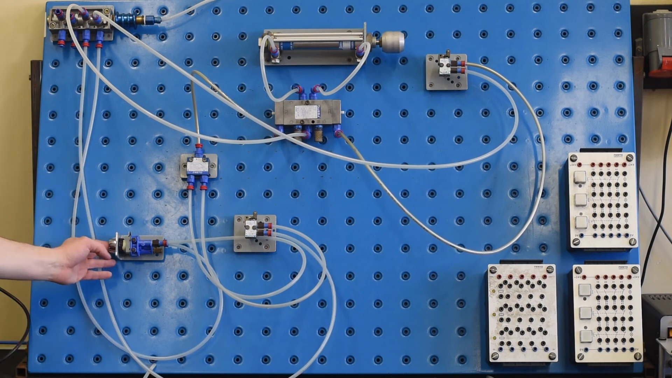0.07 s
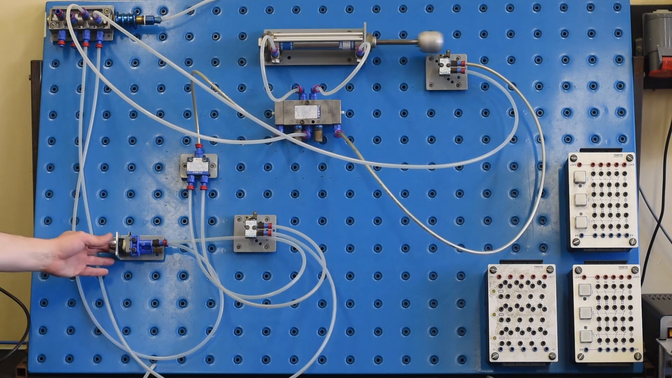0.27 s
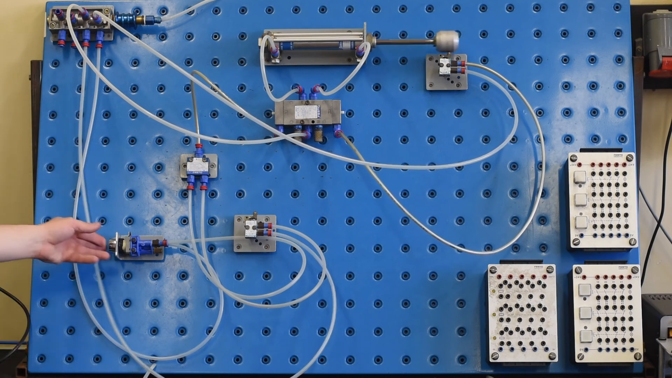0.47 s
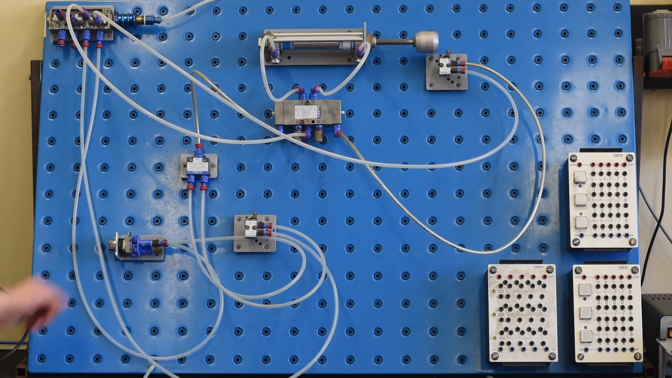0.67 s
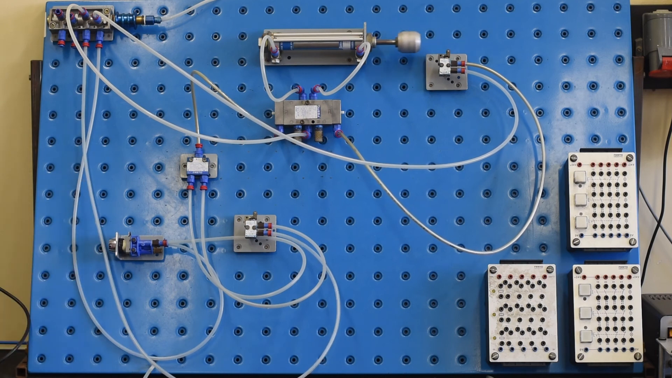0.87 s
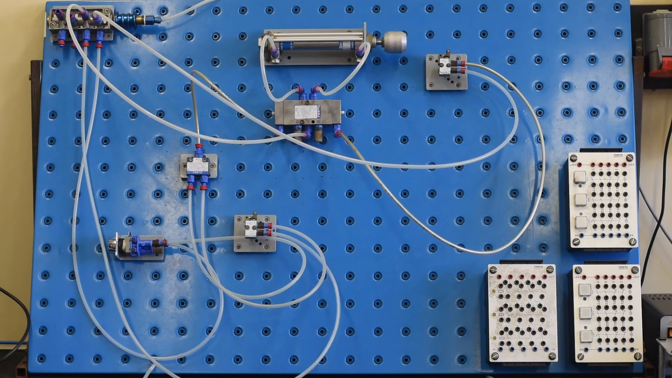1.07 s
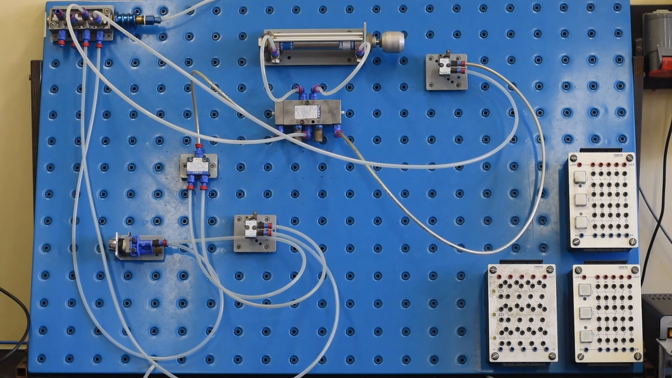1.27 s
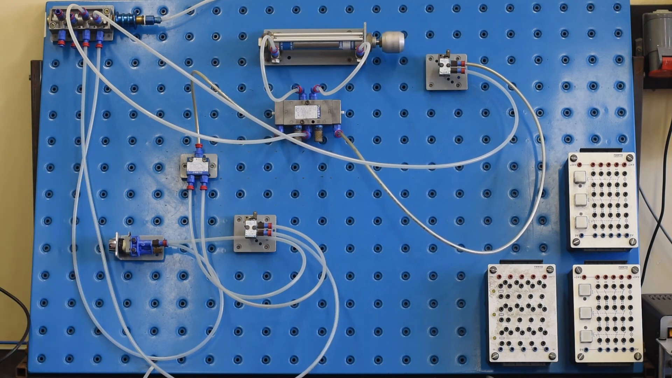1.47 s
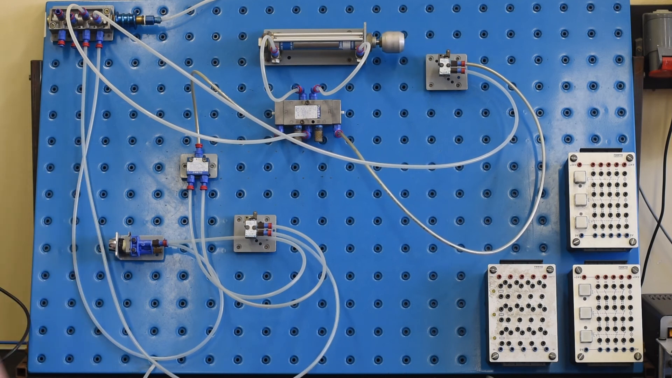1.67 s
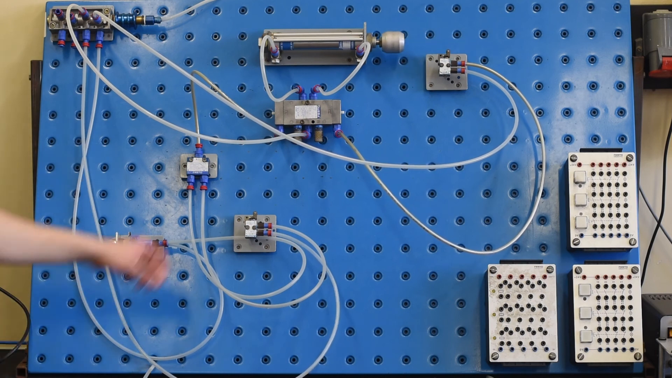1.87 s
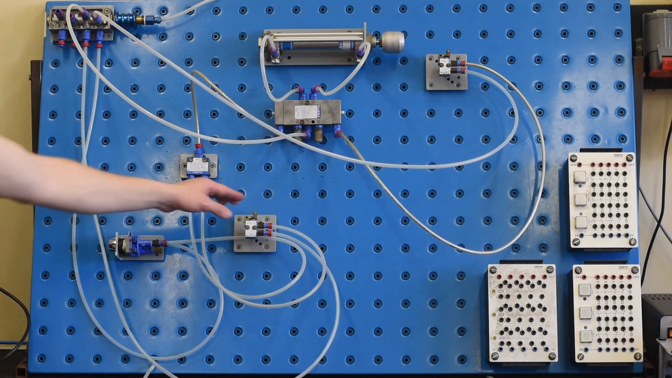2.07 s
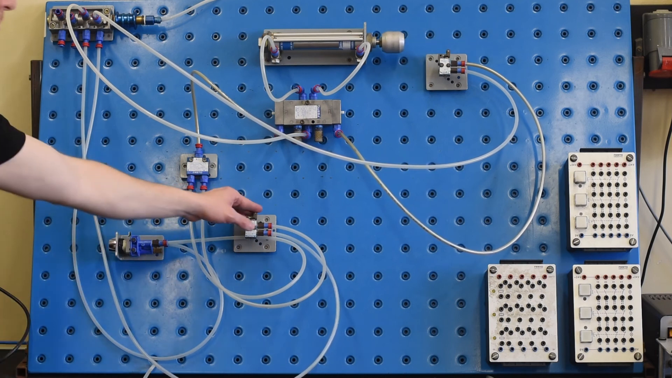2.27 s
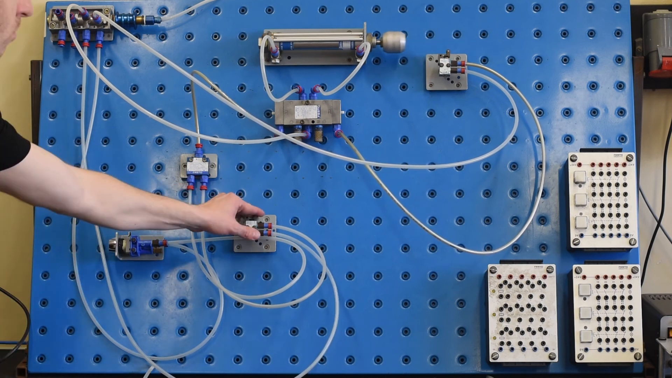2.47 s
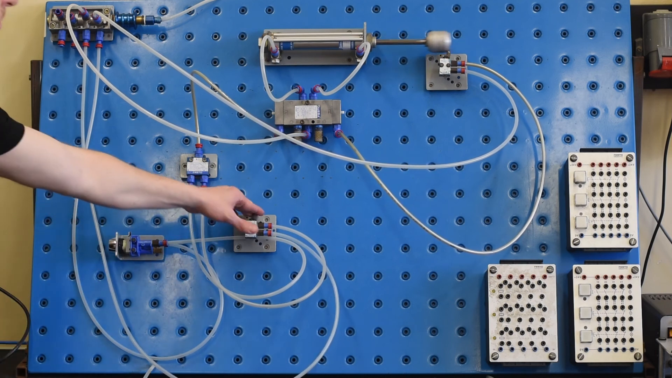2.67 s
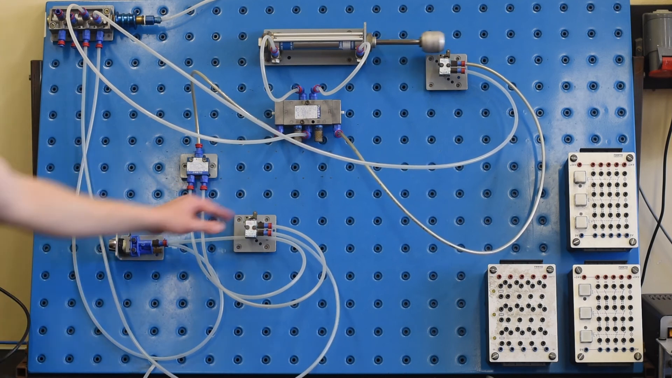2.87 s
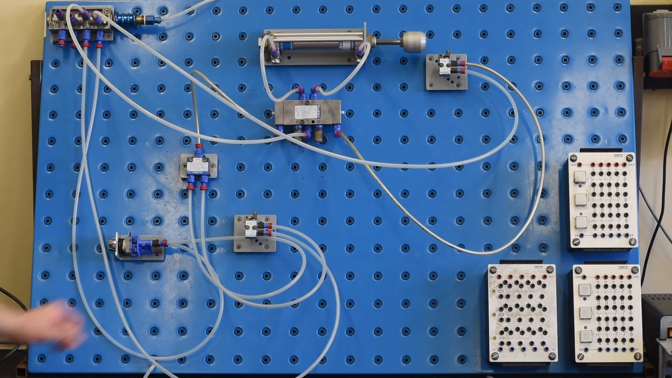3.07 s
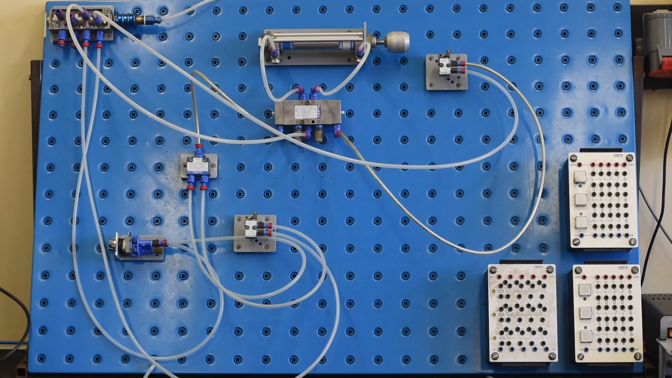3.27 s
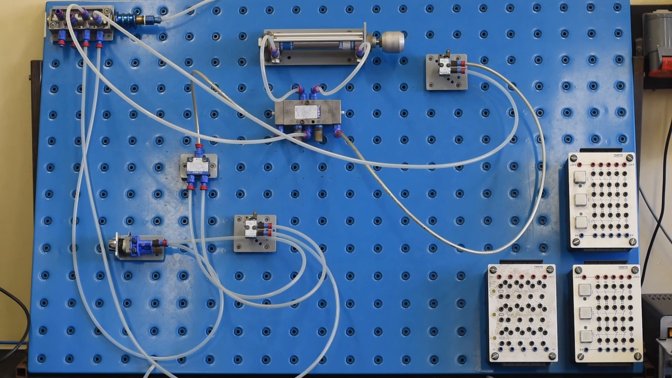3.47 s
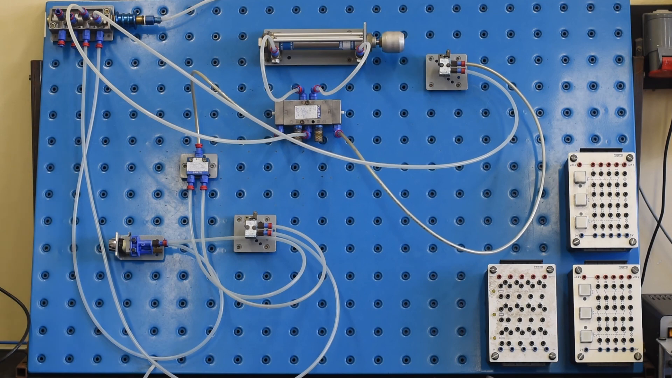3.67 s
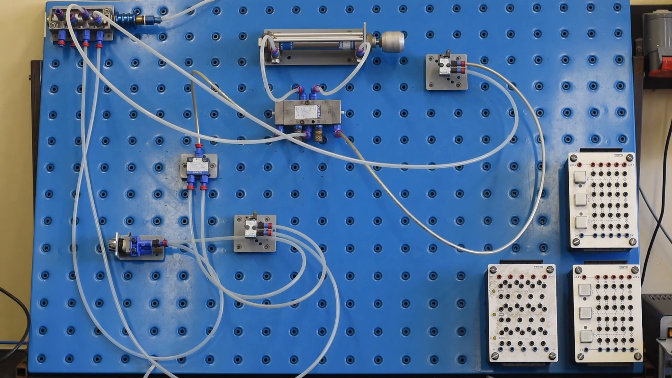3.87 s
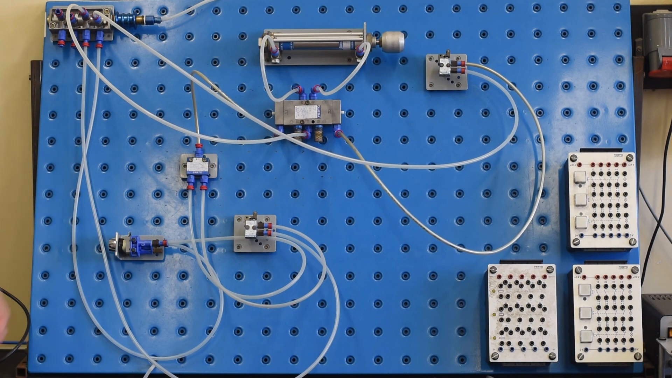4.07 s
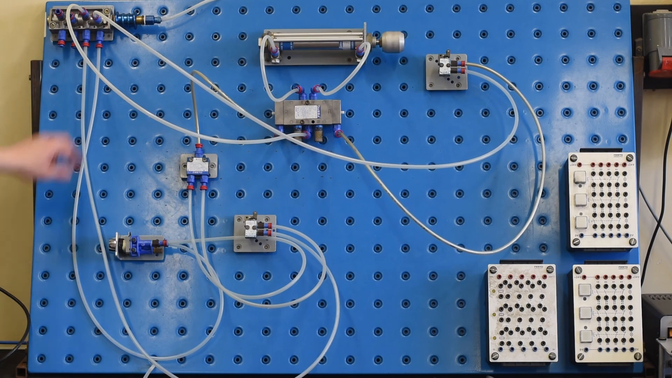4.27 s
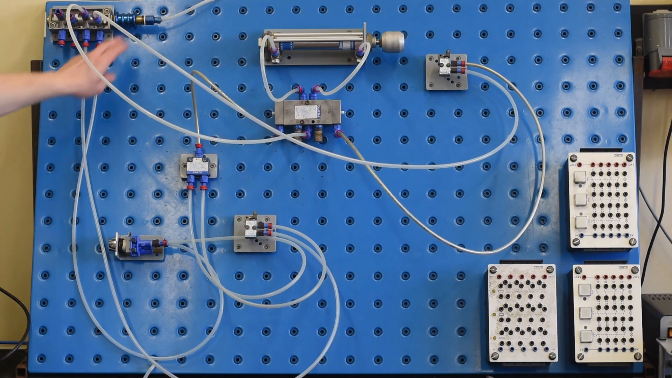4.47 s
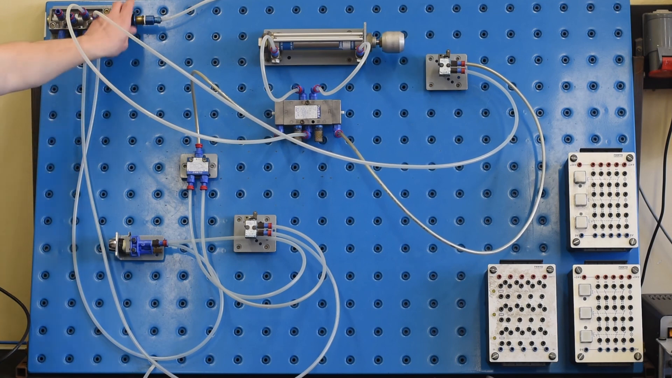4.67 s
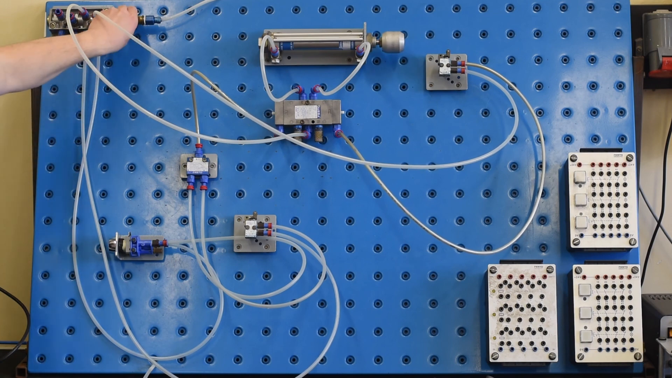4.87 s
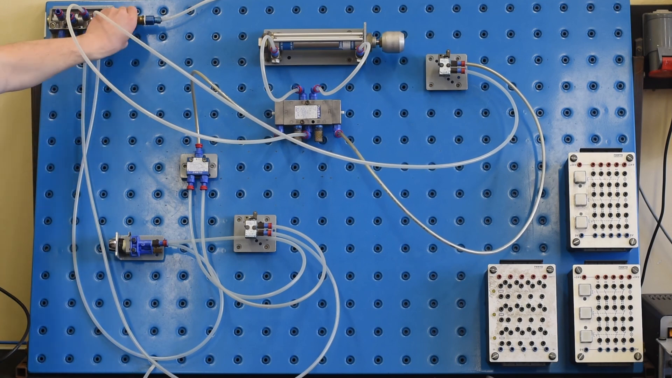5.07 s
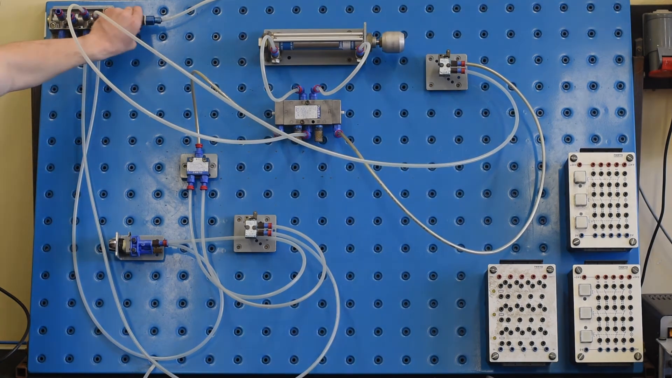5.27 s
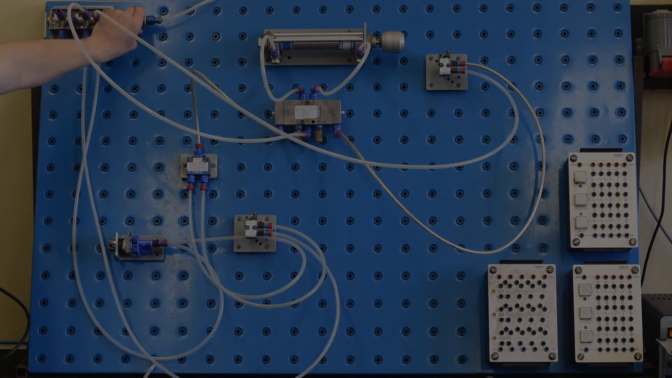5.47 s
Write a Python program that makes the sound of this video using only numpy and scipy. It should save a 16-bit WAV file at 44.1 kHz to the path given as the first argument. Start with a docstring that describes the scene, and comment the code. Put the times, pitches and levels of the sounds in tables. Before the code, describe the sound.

Close stereo pickup of a pneumatic training setup in a hard, reverberant room. Faint button ticks, valve clatter, a buzzing run of piston knocks and a short bright hiss, then a ringing return clack. Quiet hiss and low hum fill the gap before a second, similar stroke with stronger puffs. It ends on an abrupt, rough blast of air with a duller echo.

```python
"""In a bare, echoing workshop room, an air cylinder on a perforated metal board strokes out and back twice.
The valve spool and the piston clack against their stops: short pushes set damped modes ringing.
Exhaust ports puff; at the end the supply valve is shut and dumps its air, a bright burst of filtered noise
and its duller echo. A small leak hisses over the hum of the room, amid faint ticks and a low drone.
Dense reflections, dying band by band, form the room's echo."""
import sys
import numpy as np
from scipy import signal
from scipy.fft import rfft, irfft, next_fast_len
from scipy.io import wavfile
from scipy.ndimage import uniform_filter1d

SR = 44100
rng = np.random.default_rng(int(sys.argv[2]) if len(sys.argv) > 2 else 0)


def waveform_to_disk(signal):
    """Save audio, clipped to [-1, 1], as 16-bit WAV at the path in sys.argv[1]."""
    frames = np.transpose(np.atleast_2d(signal))
    scaled = np.clip(frames, -1, 1) * 32767
    samples = np.round(scaled).astype(np.int16)
    wavfile.write(sys.argv[1], SR, samples)


def gain_from_db(level_db):
    """Turn a decibel level (scalar or array-like) into a linear amplitude factor."""
    decades = np.asarray(level_db, float) / 20
    return 10 ** decades


N = 242535

# leak hiss and room air: f/Hz, relative spectral level/dB; then side below mid: f/Hz, level/dB
AIR_SPECTRUM = [(15, -51.5), (25, -24), (76, -21), (107, -9), (137, -19), (205, -5), (342, -13), (371, -7),
                (512, -6.5), (671, -10), (1090, -9), (2880, -14.5), (7400, -8), (11400, -19), (15700, -18)]
AIR_SIDE_LEVEL = [(60, -14.5), (110, -2), (200, -9.5), (380, -8), (700, -7.5), (1290, -10), (2380, -7.5),
                  (4400, -13.5), (8120, -9.5), (15000, -4)]
AIR_DB = -49.5
# resonance of the hum: f/Hz, width/Hz, level/dB; then its swells: t/s, level/dB
HUM_MODES = [(240, 124, 0)]
HUM_SWELLS = [(2.4, -57.5), (4.75, -68), (5.3, -58)]
HUM_DB, HUM_SWELL_S = -65, 0.12
# a drone, deeper than the hum, swells just after the piston comes home
DRONE_HZ, DRONE_DB = 100.7, -74
DRONE_SWELL_DB, DRONE_LAG_S, DRONE_SWELL_S = -61.5, 0.14, 0.15
# faint ticks of buttons and fittings: t/s, peak level/dB, f/Hz
TICKS = [(.017, -40, 850), (0.1206, -31.5, 1500), (0.124, -25, 800), (.364, -30, 3980), (1.104, -43, 2410),
         (3.3847, -38, 1900), (3.393, -38, 200), (3.935, -41.5, 2200), (3.936, -45, 3300)]
TICK_T60_S = 0.0078

# modes that each struck part excites through the board:
# f/Hz, width/Hz (before the damping factor), relative level/dB
SPOOL_MODES = [(104, 120, -7), (185, 100, -6.5), (392, 13.5, -11), (464, 34, -11), (552, 67, -4.5),
               (888, 149, -9.5), (1007, 125, -4), (1284, 315, -13.5), (1682, 142, -12.5),
               (1645, 106, -11.5), (2053, 91, -17.5), (2410, 77, -21), (2793, 105, -24.5),
               (3370, 120, -30.5), (4270, 150, -35.5), (4820, 290, -31.5), (5410, 340, -30)]
FRONT_CAP_MODES = [(114, 45, -6.5), (194, 53, -8.5), (352, 40.6, 1.5), (530, 102, -6.5), (579, 26, -1),
                   (830, 70, -2), (1104, 41, -4), (1500, 78, -5), (1704, 30, -1), (1878, 177, -1.5),
                   (2374, 100, -4.5), (2740, 35, -14), (2940, 150, -16), (3990, 150, -11),
                   (351.6, 2.6, -6.5)]
REAR_CAP_MODES = [(203, 10, -13.5), (276, 11, -4), (352, 20, 0.5), (579, 52, -9.5), (850, 27, -6.5),
                  (1092, 39, -10), (1275, 93, -8.5), (1398, 103, -6), (1522, 74, -13), (1946, 105, -6),
                  (2200, 250, -5.5), (2303, 63, -4.5), (2720, 78, -24), (3300, 28, -21), (3500, 55, -22),
                  (358, 6.3, 4.5)]
# the spool snaps over at each shift; further single softer knocks follow: t/s, level/dB
SHIFTS = [(.1330, -0.5), (2.4987, 0.16)]
KNOCKS = [(.388, -14), (.399, -11), (.424, -12)]
# blows within one event: t/s after its start, level/dB relative to it, push time/s
SPOOL_CHATTER = [(-.004, -23, .00013), (0, -15.5, 0.000045), (.0019, -6.5, 0.000045),
                 (.0063, -6, 0.0000051), (.009, -3, 0.000019)]
REAR_CHATTER = [(0, -12.5, 0.0000086), (.005, -27.5, 0.00006), (0.0118, -19, .00017)]
SINGLE_BLOW = [(0, 0.0012, 0.00013)]
# the piston rattles evenly on the front cap: t/s, level/dB, gap/s, loss per bounce/dB, push time factor
FRONT_STOPS = [(.4500, -7, .0039, 0.08, 0.99), (2.7690, -3, .0047, 3, 1.53)]
# push time of each successive bounce/s, before that factor; the middle bounces are the hardest
FRONT_PUSHES = [0.00013, .0001, 0.000027, 0.000027, 0.00033, 0.00012]
# the piston comes home on the rear cap: t/s, level/dB
REAR_STOPS = [(1.1750, 0.24), (3.435, .1)]

# exhaust puffs: t/s, level/dB, fall t60/s, low edge f/Hz, hose resonance level/dB
PUFFS = [(0.354, -44.5, 0.2, 3500, -20), (.431, -34.5, 0.59, 4840, -0.5), (0.604, -21, .29, 3500, -1.5),
         (2.750, -20.5, 0.24, 2500, 7), (2.874, -22.5, 0.31, 4700, -5.5)]
PUFF_RISE_S = 0.014
# jet noise before the low edge is cut: f/Hz, relative spectral level/dB
JET_SPECTRUM = [(500, -28), (2000, 7.5), (5000, -3), (9000, -1.5), (13000, -4), (16000, -7.5)]
# hose resonances: f/Hz, width/Hz, relative level/dB
HOSE_MODES = [(3050, 1060, 4), (4880, 1800, -0.5), (6000, 3700, -26)]
# air spits at each shift: fall t60/s, low edge f/Hz, rise/s
SPIT_SHAPE = (0.053, 5900, 0.002)
SPIT_LAG_S, SPIT_DB = 0.0029, -42  # level relative to the shift
# a faint seep lingers after each shift: t/s, level/dB
SEEPS = [(.149, -63), (2.515, -50)]
SEEP_T60_S, SEEP_EDGE_HZ, SEEP_RISE_S = 2.7, 3800, 0.012

# the supply valve's dump, a burst and then its echo from the far wall: t/s, level/dB
DUMP_LEVEL = [(5.302, -56), (5.31, -38), (5.320, -28.5), (5.327, -13.5), (5.335, -11.5), (5.372, -18.5),
              (5.40, -13), (5.50, -25)]
# the bright burst, its duller echo, and a brief rough noise burst: f/Hz, relative spectral level/dB
BURST_SPECTRUM = [(60, -51), (300, -18), (700, -22), (1640, -7), (2380, -15), (4000, -7.5), (7290, -9),
                  (11000, -11.5), (15700, -18.5)]
ECHO_SPECTRUM = [(35, -77.5), (60, -41), (415, -8), (603, -2.5), (743, -7), (1130, -3.5), (1390, 6.5),
                 (1840, -5), (2330, 5), (2740, -0.5), (4270, -0.5), (5520, -7.5), (15700, -30)]
ROUGH_SPECTRUM = [(18, -42), (60, -16), (458, -3.5), (611, -7.5), (1210, 2), (1790, -2), (6290, -9.5),
                  (7760, -17), (9320, -27), (15700, -26)]
# share of the bright noise before and after the sound dulls
BRIGHT_BEFORE, BRIGHT_AFTER, DULLS_AT_S, DULLS_OVER_S = 0.59, 0.089, 5.377, 0.0091
ROUGH_S, ROUGH_LASTS_S = 5.348, 0.017  # the rough noise is independent in left and right

# decay of the reflections: f/Hz, t60/s
ROOM_DECAY = [(60, 2.9), (150, 1.43), (330, 0.91), (900, 1.08), (2300, 1.104), (4500, 0.87), (8000, 0.44),
              (14000, 0.088)]
# what reflections keep: f/Hz, level/dB
WALL_REFLECTION = [(40, -9), (100, 1.5), (400, 1), (2000, -2.5), (4000, -2), (6000, -5.5), (15000, 0.5)]
# side below mid: f/Hz, level/dB
ROOM_SIDE_LEVEL = [(60, -19), (110, -26.5), (200, -37), (380, -38), (700, -27), (1290, -24.5),
                   (2380, -15.5), (4400, -12.5), (8120, -8), (15000, -1.5)]
AIMS = 3  # directions in which successive bounces throw their sound
ROOM_STARTS_S = 0.00268
# reflections come in waves as sound crosses the room and back
FIRST_WALL_S, CROSSING_S, WAVE_DB, WAVE_FADE_S = 0.0082, 0.022, 6.5, 0.019
FAR_WALL_S, FAR_WALL_DB, FAR_WALL_SPREAD_S = 0.0553, 2.5, 0.0032


def evened(x):
    """Normalisation: scales to an rms of 1."""
    return x / np.sqrt(np.mean(x ** 2) + 1e-20)


def read(points, hz):
    """Interpolation: reads a table of f/Hz and value on a log-frequency axis."""
    f, value = np.transpose(points)
    return np.interp(np.log(hz + 1), np.log(f + 1), value)


def coloured(x, points, turn=1):
    """Linear filtering: weights the spectrum by a table of f/Hz, level/dB and a constant phase turn."""
    size = next_fast_len(len(x))
    gain = gain_from_db(read(points, np.fft.rfftfreq(size, 1 / SR)))
    return irfft(turn * rfft(x, size) * gain, size)[:len(x)]


def resonant(x, peaks):
    """Resonance: passes x through parallel resonators of alternating sign."""
    hz = np.fft.rfftfreq(len(x), 1 / SR)
    response = sum((-1) ** k * gain_from_db(db) / (1 + 2j * (hz - f) / width)
                   for k, (f, width, db) in enumerate(peaks))
    return irfft(rfft(x) * response, len(x))


def add(mix, s, sound):
    """Superposition: mixes a sound in at time s."""
    part = mix[round(s * SR):][:len(sound)]
    part += sound[:len(part)]


def swells(rest_db, peaks, width_s):
    """Envelope: a resting level plus bell-shaped swells at t/s, level/dB."""
    t = np.arange(N) / SR
    return gain_from_db(rest_db) + sum(gain_from_db(db) * np.exp(-((t - s) / width_s) ** 2) for s, db in peaks)


def background():
    """Broadband noise: leak hiss and room air, with a resonant hum that comes and goes."""
    mid, side, low, low_side = rng.standard_normal((4, N))
    mid, side = coloured(mid, AIR_SPECTRUM), coloured(side, AIR_SPECTRUM)
    air = np.array([mid, coloured(side, AIR_SIDE_LEVEL)]) * gain_from_db(AIR_DB) / mid.std()
    hum = np.array([evened(resonant(low, HUM_MODES)), gain_from_db(-23) * evened(resonant(low_side, HUM_MODES))])
    return air + swells(HUM_DB, HUM_SWELLS, HUM_SWELL_S) * hum


def drone():
    """Narrow-band noise: one sharp resonance makes a wavering low note."""
    note = resonant(rng.standard_normal(N), [(DRONE_HZ, 9, 0)])
    peaks = [(s + DRONE_LAG_S, DRONE_SWELL_DB) for s, _ in REAR_STOPS]
    return evened(note) * swells(DRONE_DB, peaks, DRONE_SWELL_S)


def ticks():
    """Damped oscillation: each tick is one short, exponentially dying ring."""
    t, out = np.arange(SR // 20) / SR, np.zeros(N)
    for s, db, hz in TICKS:
        add(out, s, gain_from_db(db - 60 * t / TICK_T60_S) * np.sin(2 * np.pi * hz * t))
    return out


def strokes(starts, chatter):
    """Repetition: lays one chatter pattern at every start."""
    return [[(s + after, db + more_db, push_s) for after, more_db, push_s in chatter]
            for s, db in starts]


def clacks(runs, modes, damping):
    """Modal impact: each short push sets the modes ringing; a longer contact is duller."""
    t, out = np.arange(SR // 2) / SR, np.zeros((AIMS, N))
    ring = np.zeros(len(t))
    for k, (f, width, db) in enumerate(modes):
        decay = np.exp(-np.pi * damping * width * t)
        onset = 1 - np.exp(-t * f / 1.14)  # low modes take longer to spread through the board
        ring += (-1) ** k * gain_from_db(db) * width * decay * np.sin(2 * np.pi * f * t) * onset
    ring /= abs(ring).max()
    for blows in runs:
        for bounce, (s, db, push_s) in enumerate(blows):
            push = t[:300] * np.exp(-t[:300] / push_s)
            add(out[bounce % AIMS], s, gain_from_db(db) * signal.oaconvolve(ring, push / push.sum()))
    # the perforated board radiates little bass
    return signal.sosfilt(signal.butter(2, 95, "high", fs=SR, output="sos"), out)


def spool_clacks():
    """Heavily damped impact: the spool chatters at each shift; single softer knocks ring through the same
    modes."""
    return clacks(strokes(SHIFTS, SPOOL_CHATTER) + strokes(KNOCKS, SINGLE_BLOW), SPOOL_MODES, 4.0)


def puff(db, t60, edge_hz, rise_s, hose_db=-20):
    """Jet noise: opens fast and dies as the pressure falls; hose resonances colour it."""
    t = np.arange(SR // 2) / SR
    noise = rng.standard_normal(len(t))
    high_pass = signal.butter(3, edge_hz, "high", fs=SR, output="sos")
    jet = evened(signal.sosfilt(high_pass, coloured(noise, JET_SPECTRUM)))
    jet = jet + gain_from_db(hose_db) * evened(resonant(noise, HOSE_MODES))
    ragged_db = 1.25 * evened(uniform_filter1d(rng.standard_normal(len(t)), 250))  # the flow flutters
    opening = np.sin(np.pi / 2 * np.minimum(t / rise_s, 1)) ** 0.88
    return jet * gain_from_db(db + ragged_db - 60 * t / t60) * opening


def puffs():
    """Turbulent discharge: the exhaust puffs, and the spits and seeps of each shift."""
    out = np.zeros(N)
    for s, db in SHIFTS:
        add(out, s + SPIT_LAG_S, puff(db + SPIT_DB, *SPIT_SHAPE))
    for s, db in SEEPS:
        add(out, s, puff(db, SEEP_T60_S, SEEP_EDGE_HZ, SEEP_RISE_S))
    for s, db, t60, edge_hz, hose_db in PUFFS:
        add(out, s, puff(db, t60, edge_hz, PUFF_RISE_S, hose_db))
    return out


def front_cap_clacks():
    """Repeated impact: the piston bounces at even gaps, nearly level in the first run, fading in the second."""
    runs = [[(s + k * gap, db - k * loss_db, factor * push_s) for k, push_s in enumerate(FRONT_PUSHES)]
            for s, db, gap, loss_db, factor in FRONT_STOPS]
    return clacks(runs, FRONT_CAP_MODES, 3.06)


def rear_cap_clacks():
    """Modal impact: the piston comes home and chatters on the rear cap."""
    return clacks(strokes(REAR_STOPS, REAR_CHATTER), REAR_CAP_MODES, 2.47)


def dump():
    """Jet noise and echo: a bright air burst, then its duller echo from the far wall about 60 ms later.

    Returns that sound and a brief rough noise burst, independent in left and right."""
    t = np.arange(N) / SR
    noise, *left_right = rng.standard_normal((3, N))
    level = gain_from_db(np.interp(t, *np.transpose(DUMP_LEVEL), left=-120))
    still_bright = (1 - np.tanh((t - DULLS_AT_S) / DULLS_OVER_S)) / 2
    share = BRIGHT_AFTER + (BRIGHT_BEFORE - BRIGHT_AFTER) * still_bright
    bright, dull = (evened(coloured(noise, table)) for table in (BURST_SPECTRUM, ECHO_SPECTRUM))
    rough = evened(np.array([coloured(channel, ROUGH_SPECTRUM) for channel in left_right]))
    rough_envelope = np.exp(-((t - ROUGH_S) / ROUGH_LASTS_S) ** 4)
    return level * (share * bright + (1 - share) * dull), level * rough_envelope * rough


def spread(x):
    """Decorrelation: a jet is a wide source, so its side signal is a scattered copy."""
    t = np.arange(SR // 10) / SR
    scatter = rng.standard_normal(len(t)) * np.exp(-t / .015)
    return coloured(signal.oaconvolve(x, scatter / np.linalg.norm(scatter))[:N], ROOM_SIDE_LEVEL)


def room_echo():
    """Reverberation: dense reflections dying band by band, mid and side for each direction."""
    size = 3 * SR // 2
    taps = rng.standard_normal((AIMS, 2, size)) * (rng.random((AIMS, 2, size)) < .3)
    hz, t, z = signal.stft(taps, SR, nperseg=256)
    decay = gain_from_db(-60 * t / read(ROOM_DECAY, hz)[:, None])
    tail = signal.istft(z * decay, SR, nperseg=256)[1][..., :size]
    t = np.arange(size) / SR
    waves_db = WAVE_DB * np.exp(-t / WAVE_FADE_S) * np.cos(2 * np.pi * (t - FIRST_WALL_S) / CROSSING_S)
    waves_db = waves_db + FAR_WALL_DB * np.exp(-((t - FAR_WALL_S) / FAR_WALL_SPREAD_S) ** 2)
    tail *= gain_from_db(waves_db) * (t > ROOM_STARTS_S)
    return tail / np.linalg.norm(tail, axis=2, keepdims=True)


def in_room(aimed, echo, wet_db, direct_side_db):
    """Phase difference: two close microphone ports, whose small phase gap is the side signal."""
    wet = sum(signal.fftconvolve(coloured(x, WALL_REFLECTION)[None], e, axes=1)[:, :N]
              for x, e in zip(aimed, echo))
    mid, side = gain_from_db(wet_db) * wet
    direct = np.sum(aimed, axis=0)
    return np.array([direct + mid, coloured(gain_from_db(direct_side_db) * direct + side, ROOM_SIDE_LEVEL, 1j)])


def scene():
    """Superposition: clacks, ticks and jets share one room echo; the rest is added directly."""
    echo = room_echo()
    caps = front_cap_clacks() + rear_cap_clacks()
    air = puffs()
    jet, rough_burst = dump()
    mid, side = (background()
                 + in_room([ticks()], echo, wet_db=8.0, direct_side_db=-14)
                 + in_room(spool_clacks(), echo, wet_db=2.0, direct_side_db=-3)
                 + in_room([air], echo, wet_db=0.0, direct_side_db=-24)
                 + in_room(caps, echo, wet_db=5.5, direct_side_db=-6)
                 + in_room([jet], echo, wet_db=-6, direct_side_db=-3))
    mid = mid + drone()
    side = side + gain_from_db(-4.5) * spread(air + jet)
    return np.array([mid + side, mid - side]) + rough_burst


def low_pass(x):
    """Removes everything above the highest recorded frequency."""
    return signal.sosfilt(signal.butter(12, 15890, fs=SR, output="sos"), x)


def record(dry):
    """Signal chain: the finished mix passes through the last stage."""
    return low_pass(dry)


dry = scene()
out = record(dry)
waveform_to_disk(out)
```